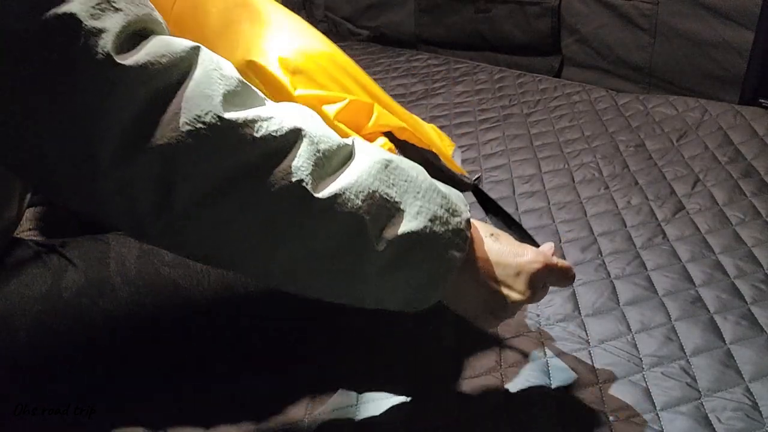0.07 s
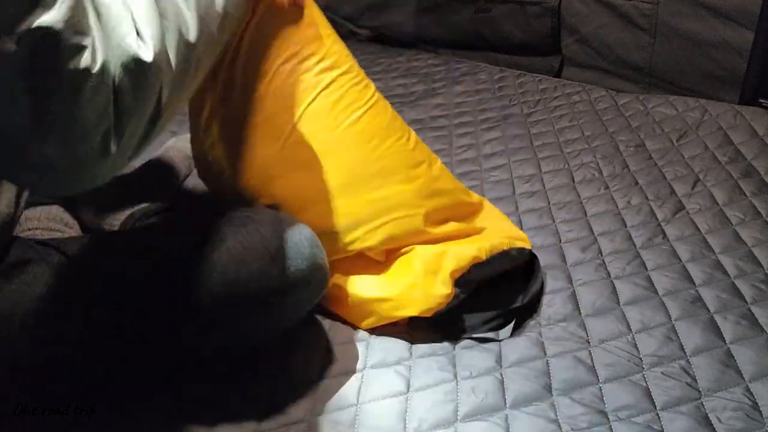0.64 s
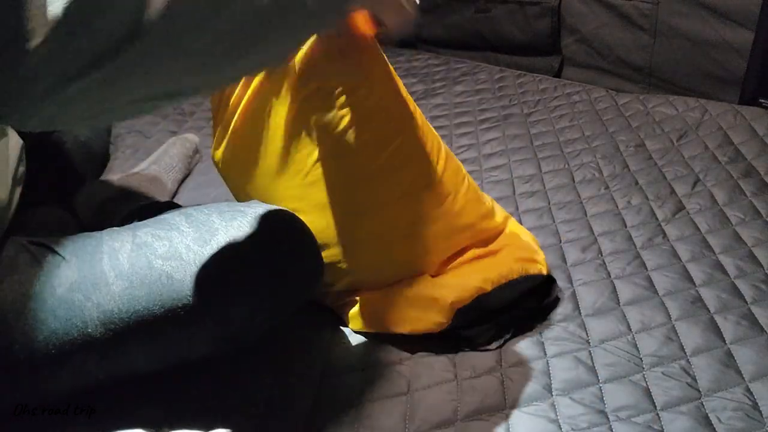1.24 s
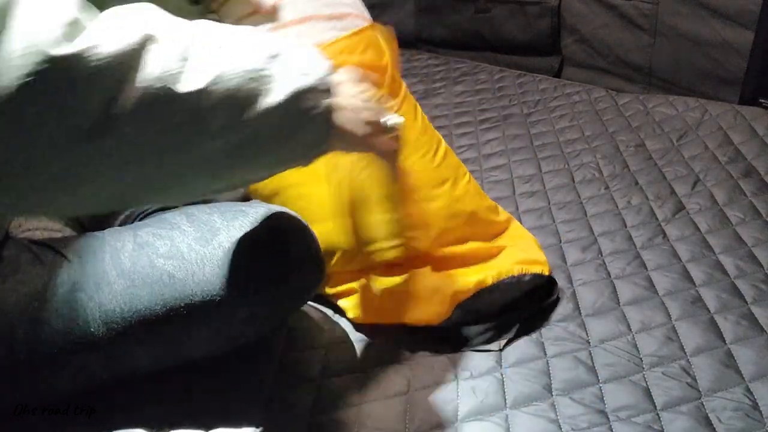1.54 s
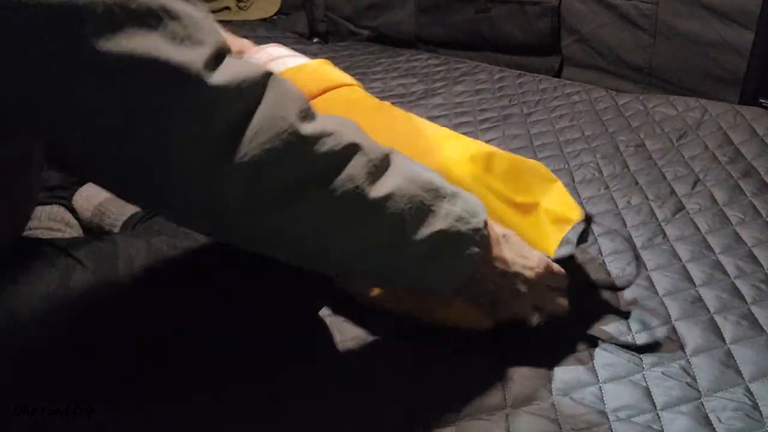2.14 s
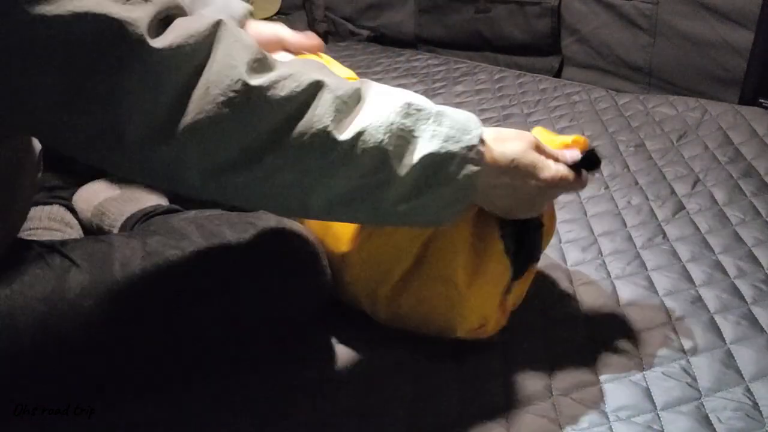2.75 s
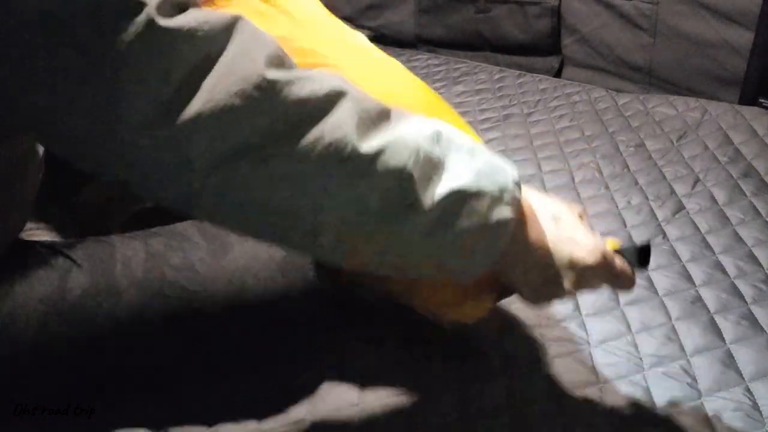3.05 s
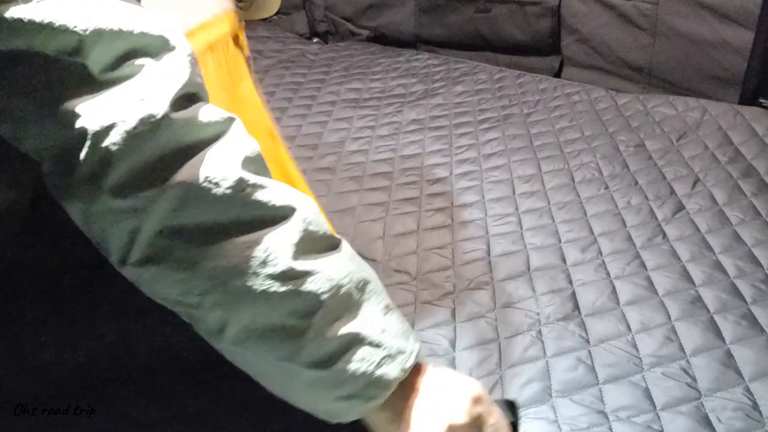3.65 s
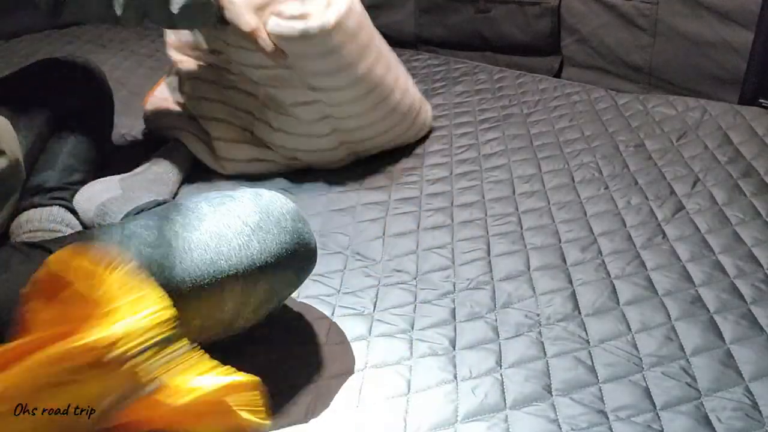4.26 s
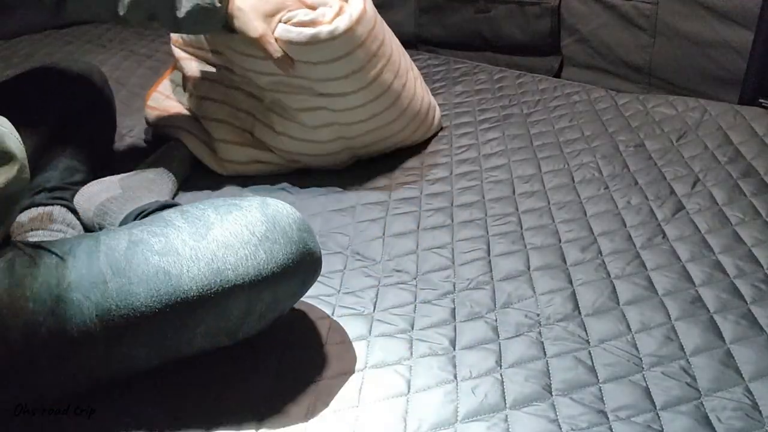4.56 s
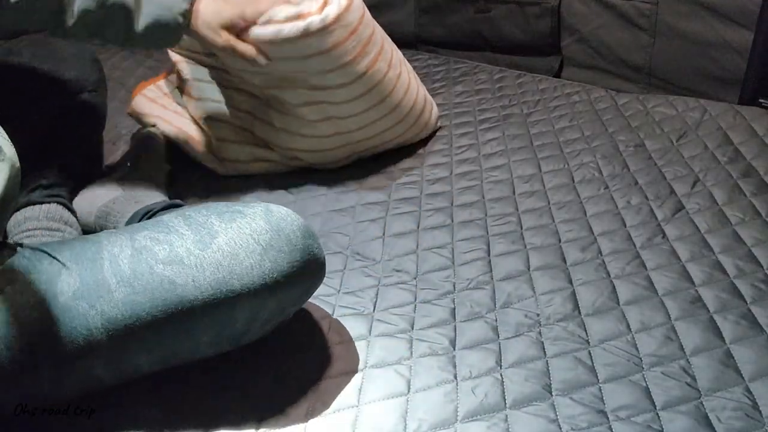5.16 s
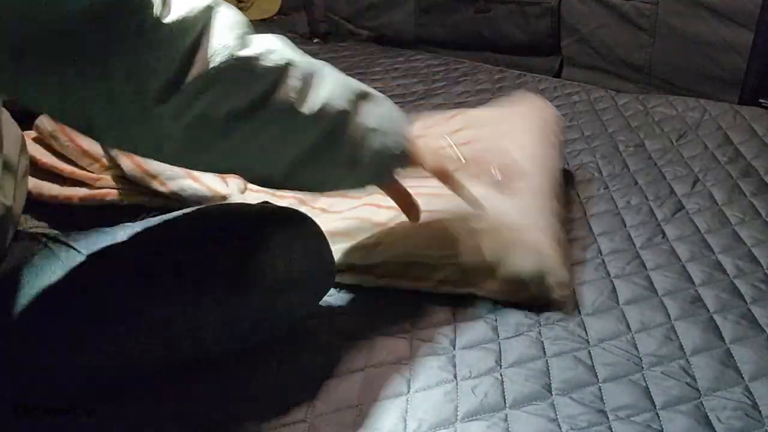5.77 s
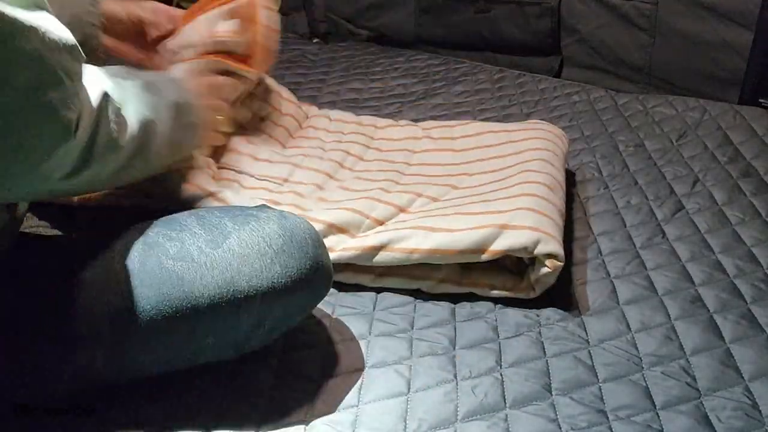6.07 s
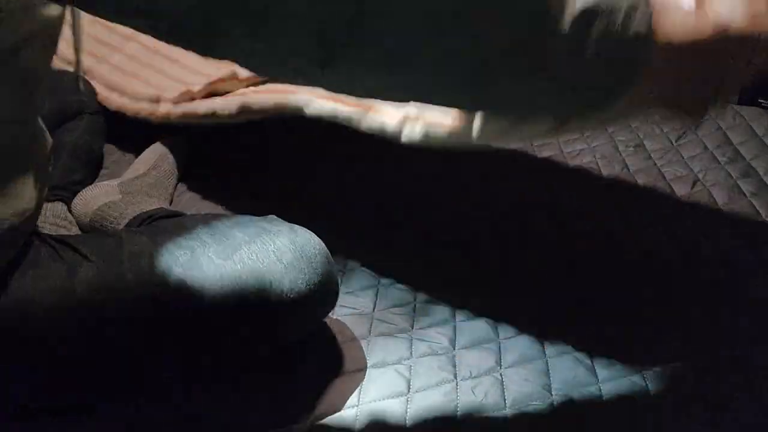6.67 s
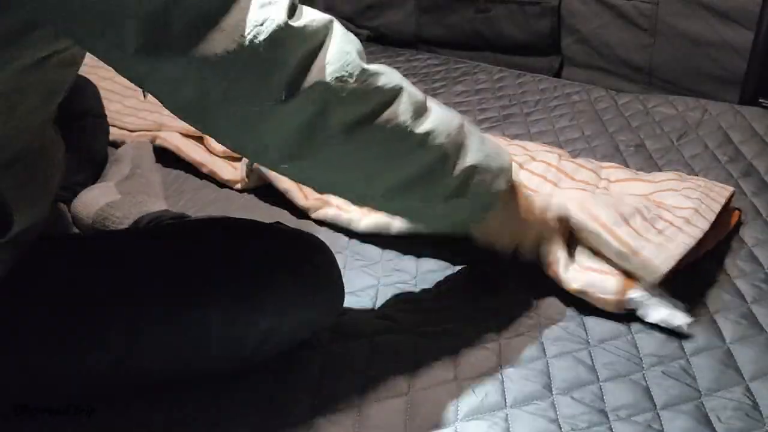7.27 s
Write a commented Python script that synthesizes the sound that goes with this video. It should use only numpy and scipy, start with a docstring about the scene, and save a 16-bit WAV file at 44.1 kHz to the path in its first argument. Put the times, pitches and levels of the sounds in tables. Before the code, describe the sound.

Hands tug at a nylon sack around a rolled blanket, making short hissing swishes and small crinkles. One long, bright pull strips the sack off. It squeaks faintly under the fingers and lands with a clack and a hollow knock. The blanket then rustles more softly as it unrolls, flaps open with a deep thump on the mattress and is smoothed flat. Everything is close, in a small tent with no echo.

```python
"""In a small, echo-free tent, hands tug at a nylon sack around a rolled blanket: nylon hisses as it
slides, soft cloth rubs and creases snap. At 3 s one long pull strips the sack off. It squeaks under the
fingers, is tossed aside and lands at 4.7 s with a clack of its toggle and a hollow knock. The blanket is
unrolled, flaps open near 7 s with a deep thump of the quilted mattress, and is smoothed flat."""
import sys
import numpy as np
from scipy import signal
from scipy.fft import rfft, irfft, next_fast_len
from scipy.io import wavfile

SR = 44100
rng = np.random.default_rng(int(sys.argv[2]) if len(sys.argv) > 2 else 0)


def generate_wav(sig):
    """Save sig (samples, or channels by samples) to the path in sys.argv[1] as 16-bit PCM at SR."""
    pcm = np.round(np.clip(np.atleast_2d(sig).T, -1, 1) * 32767).astype(np.int16)
    wavfile.write(sys.argv[1], SR, pcm)


N = 332073


# the tone of sliding nylon: f/Hz, level/dB
NYLON_TONE = [(50, -40), (140, -4.5), (300, -26), (500, -25), (800, -17.5), (1700, -8.5), (3000, -5.5),
              (4700, -3), (6000, -3), (7200, -3), (9700, -1), (12600, -4.5), (14000, -9), (15800, -17.5)]
def nylon(level_db, slips_per_s=24000, spread_db=2.0, flutter_db=0.84, dull_hz=7000, dull_share=0.25):
    """A fine weave slides: a faster pull gives more tiny slips and a smoother, brighter hiss."""
    speed = from_db((level_db - level_db.max()) / 2)
    hiss = coloured(friction(slips_per_s * speed, spread_db), NYLON_TONE)
    dull = dull_share * (1 - speed)
    hiss = (1 - dull) * hiss + dull * filtered(hiss, dull_hz, "low", order=1)
    return hiss * from_db(level_db + flutter_db * drift(90))


# the tone of rubbing cloth: f/Hz, level/dB
CLOTH_TONE = [(80, -7), (200, 2.5), (300, 1), (450, 2.5), (800, 1.5), (1300, 3), (2400, -1.5), (4500, -5),
              (5900, -6), (7300, -9.5), (11000, -11.5), (15500, -37)]
def cloth(level_db, slips_per_s=4000, spread_db=2.5, patchy_db=2.5, gain_db=3.5):
    """Blanket and sleeves rub with coarser, duller slips; each octave swells alone as the folds shift."""
    rest = coloured(friction(slips_per_s, spread_db), CLOTH_TONE)
    rub = 0
    for edge_hz in 300 * 2 ** np.arange(5):
        band = signal.sosfiltfilt(signal.butter(2, edge_hz, fs=SR, output="sos"), rest)
        rub = rub + band * from_db(patchy_db * drift(70))
        rest = rest - band
    return rms_one(rub + rest) * from_db(level_db + gain_db)


# hands stroking sack and blanket: middle t/s, length/s, nylon level/dB, cloth level/dB
HAND_STROKES = [(0.132, 0.56, -45, -62.5), (0.514, 0.17, -59, -79), (0.615, 0.12, -56, -58.5),
                (1.0, 0.13, -66, -68), (1.237, 0.24, -57, -70), (1.411, 0.16, -49.5, -58.5),
                (1.671, 0.19, -55, -60), (1.859, 0.14, -56, -63.5), (1.986, 0.14, -51, -61),
                (2.097, 0.12, -50.5, -55), (2.18, .2, -56.5, -60.5), (2.5, 0.067, -51.5, -57),
                (2.569, 0.086, -49.5, -55), (2.74, 0.18, -51, -56), (2.877, 0.1, -56, -64),
                (3.983, 0.17, -53.5, -62), (4.186, 0.21, -47, -58), (4.34, 0.13, -53, -55.5),
                (4.59, 0.13, -53.5, -66), (4.74, 0.33, -58.5, -63), (5.035, 0.21, -57, -63),
                (5.129, 0.14, -51.5, -55.5), (5.262, .115, -58, -62), (5.446, 0.073, -61, -60.5),
                (5.601, 0.29, -64, -60), (5.882, .1, -69, -59.5), (6.128, .28, -61.5, -60.5),
                (6.356, .045, -63.5, -60.5), (6.55, 0.17, -62.5, -60.5), (6.595, 0.049, -52, -60),
                (6.816, 0.11, -59, -61.5), (6.985, 0.13, -61, -60), (7.24, 0.36, -59.5, -66),
                (7.362, 0.032, -54, -58), (7.42, 0.078, -60, -74)]
# the long pull that strips the sack off: t/s, nylon level/dB, cloth level/dB
LONG_PULL = [(2.995, -73, -80), (3.011, -49.5, -60), (3.145, -42, -51.5), (3.25, -41.5, -56.5),
             (3.36, -44, -57.5), (3.6, -42, -54.5), (3.76, -42.5, -46), (3.835, -55, -56.5),
             (3.88, -75, -80)]
# sleeves and bedding rustling between strokes: t/s, nylon level/dB, cloth level/dB
LIGHT_RUSTLE = [(0.0, -73, -82), (0.42, -71, -83), (0.74, -64.5, -66.5), (0.88, -64, -75.5),
                (1.75, -67.5, -71), (2.1, -59.5, -63.5), (2.45, -56.5, -63), (2.98, -58, -64.5),
                (3.88, -55.5, -56.5), (4.45, -55.5, -59.5), (4.9, -57.5, -63.5), (5.35, -62, -64.5),
                (5.85, -67.5, -70), (6.35, -68, -66), (7.53, -68, -65.5)]
def handling(uneven_db=1.5, changes_per_s=30):
    """Moving hands set how loud the nylon and the cloth are: one curve in dB for each."""
    middle, length, *stroke_dbs = np.transpose(HAND_STROKES)
    t, levels = np.arange(N) / SR, []
    pulling = (t > LONG_PULL[0][0]) & (t < LONG_PULL[-1][0])
    wobble_db = uneven_db * drift(changes_per_s)
    for stroke_db, pull_db, rustle_db in zip(stroke_dbs, curves(LONG_PULL), curves(LIGHT_RUSTLE)):
        rest_db = rustle_db + wobble_db
        rest_db = np.where(pulling, np.maximum(pull_db, rest_db), rest_db)
        levels.append(swells(zip(middle, length, stroke_db), rest_db))
    return levels


# the sack landing and settling: t/s, thud level/dB, clack level/dB
LANDINGS = [(4.672, -57, -35), (4.676, -34, -30.5), (4.6793, -23, -35.5), (4.6839, -26.5, -34),
            (4.699, -32.5, -64), (4.717, -39, -58.5), (4.747, -51, -38.5), (4.753, -47, -42.5),
            (5.14, -48, -37.5)]
# the notes of the hollow thing it lands on: f/Hz, level/dB, time to fade by 60 dB/s
HOLLOW_NOTES = [(215.4, -12, 0.14), (420, -1.5, 0.044), (465, -11, .08), (573, -1.5, 0.078),
                (693, -1.5, 0.032), (740, -3, 0.053), (926, -15, 0.042)]
# the notes of the hard toggle on its cord: f/Hz, level/dB, time to fade by 60 dB/s
TOGGLE_NOTES = [(975, -1.5, 0.035), (1895, -3.5, 0.025), (2040, -11, 0.023), (2330, -8, 0.024),
                (2830, -8, 0.042), (3900, -11, 0.028), (5140, -12.5, .025)]
def sack_landing():
    """The toggle clacks first, then the weight of the sack follows and bounces."""
    out = np.zeros(N)
    for s, thud_db, clack_db in LANDINGS:
        add(out, s, from_db(thud_db) * struck(HOLLOW_NOTES) + from_db(clack_db) * struck(TOGGLE_NOTES))
    return out


# soft blows on padding and blanket: t/s, level/dB, f/Hz, time to fade by 60 dB/s, ringing share (0-1)
SOFT_BLOWS = [(0.58, -50.5, 200, .1, .1), (1.579, -41.5, 255, 0.16, 0.9), (1.672, -27, 125, 0.048, .7),
              (1.799, -42, 640, 0.017, 0.5), (1.861, -43, 274, 0.054, .6), (1.965, -39, 524, .018, 0.4),
              (2.123, -40.5, 100, .1, 0.5), (2.576, -43.5, 230, 0.076, .1), (2.775, -48, 200, 0.094, 0.16),
              (3.207, -32.5, 480, 0.022, 0.3), (3.77, -38.5, 224, .07, .2), (4.68, -27.5, 210, 0.067, 0.5),
              (4.718, -34, 226, 0.15, 0.4), (4.754, -36.5, 340, .087, .8), (4.941, -31.5, 186, 0.054, 0.84),
              (5.145, -39, 139, 0.088, 0.24), (5.893, -44, 256, 0.081, 0.2), (6.965, -24, 135, 0.059, 0.73),
              (7.008, -28, 150, 0.067, .5), (7.018, -22.5, 262, .019, .7), (7.359, -26, 540, 0.016, 0.4),
              (7.365, -34, 310, 0.037, .35)]
def thumps(more_blows, puff_db=-2.5, rise_s=0.00059):
    """Each blow rings briefly and squeezes out a dull puff of air."""
    out, t = np.zeros(N), np.arange(SR // 3) / SR
    for s, db, hz, fade_s, ringing in SOFT_BLOWS + more_blows:
        puff = rms_one(filtered(rng.standard_normal(len(t)), [hz / 2, hz * 1.74], "band"))
        puff *= np.sqrt(1 - ringing) * from_db(puff_db)
        ring = -np.sqrt(ringing) * np.sin(2 * np.pi * hz * t)
        fade = (1 - np.exp(-t / rise_s)) * from_db(-60 * t / fade_s)
        add(out, s, from_db(db) * fade * (puff + ring))
    return out


def blanket_flap(start_s=6.941, length_s=.066, folds=6, fold_hz=215, fade_s=0.062, ringing=.35):
    """The folds slap down one after another, hardest in the middle of the run; rows for thumps()."""
    chance, rows = np.clip(rng.standard_normal((folds, 2)), -2, 2), []
    for along, (late, pitch) in zip(np.linspace(0, 1, folds), chance):
        s = start_s + length_s * along + .002 * late
        db = -30.5 - 7 * (1 - np.sin(np.pi * along))
        rows.append((s, db, fold_hz * np.exp(.4 * pitch), fade_s, ringing))
    return rows


# heavy loads on the mattress: t/s, level/dB
HEAVY_LOADS = [(2.124, -39), (4.694, -36), (4.952, -33), (5.905, -47), (6.974, -26), (7.029, -32)]
def mattress_bounces(hz=61.3, fade_s=0.22, ringing=0.68):
    """The mattress bounces, always at its own deep pitch; rows for thumps()."""
    return [(s, db, hz, fade_s, ringing) for s, db in HEAVY_LOADS]


# creases snapping over: t/s, level/dB, middle f/Hz, length/s
CREASE_SNAPS = [(0.608, -40, 1400, .007), (0.615, -36.5, 4200, 0.0065), (0.649, -43, 1300, .0035),
                (0.682, -40.5, 4000, .0025), (1.183, -43.5, 1400, .006), (1.618, -37.5, 1590, 0.0021),
                (1.667, -35, 1600, .014), (1.673, -29.5, 7500, 0.012), (1.964, -33, 2700, .005),
                (2.078, -33, 3200, .0016), (2.121, -23, 1200, 0.0013), (2.283, -39, 1000, .0027),
                (2.4, -43, 1800, 0.002), (2.61, -28, 3820, 0.0015), (2.751, -36, 4100, .004),
                (4.011, -35, 890, 0.0064), (4.104, -36, 7400, .006), (4.673, -24.5, 2500, 0.0082),
                (4.885, -40, 5540, .0043), (5.138, -23.5, 1260, 0.0019), (7.292, -34, 1700, 0.0024),
                (7.343, -39, 860, 0.013), (7.358, -31, 2300, 0.0052)]
def creases(more_snaps, gain_db=-6.0, rise_share=0.19):
    """A fold buckles with a short crackle around its own pitch; a longer one builds more slowly."""
    out, t = np.zeros(N), np.arange(SR // 10) / SR
    for s, db, hz, length in CREASE_SNAPS + more_snaps:
        crackle = filtered(rng.standard_normal(len(t)), hz * 0.51, "high")
        crackle = filtered(crackle, hz * 1.54, "low")
        fade = (1 - np.exp(-t / (rise_share * length))) * np.exp(-t / length)
        snap = rms_one(crackle * fade) * np.sqrt(np.mean(fade ** 2))
        add(out, s, from_db(db + gain_db) * snap)
    return out


def small_creases(cloth_db, per_s=5.0, boost_db=14.5, hz=2400, length_s=0.0044):
    """Small folds tick at random, louder when the cloth rubs harder; rows for creases()."""
    moments = np.flatnonzero(rng.random(N) < per_s / SR)
    chance = np.clip(rng.standard_normal((len(moments), 2)), -2, 2)
    return [(at / SR, cloth_db[at] + boost_db + 2.0 * size, hz * np.exp(0.72 * pitch), length_s)
            for at, (size, pitch) in zip(moments, chance)]


# tight nylon zipping over a finger: t/s, length/s, start f/Hz, end f/Hz, level/dB
FINGER_ZIPS = [(2.099, 0.022, 650, 1090, -45), (2.113, 0.0077, 1900, 5960, -32.5),
               (4.023, 0.017, 3250, 3900, -48), (4.342, .025, 5200, 3450, -46),
               (4.593, 0.021, 2700, 4040, -44), (4.876, 0.0204, 5230, 5870, -50),
               (7.255, 0.0065, 1840, 2200, -47)]
def finger_squeaks(from_s=3.97, to_s=4.87, per_s=70, level_db=-53, pitch_hz=3600, length_s=0.0116):
    """Fingers drag on the sack: a few clear zips, and a spell of tiny random squeaks."""
    out, t = np.zeros(N), np.arange(N) / SR
    for s, length, start_hz, end_hz, db in FINGER_ZIPS:
        add(out, s, from_db(db) * squeak(length, start_hz, end_hz))
    dragging = (t > from_s) & (t < to_s)
    for s in t[dragging & (rng.random(N) < per_s / SR)]:
        pitch, bend, size = np.clip(rng.standard_normal(3), -2, 2)
        hz = pitch_hz * np.exp(.25 * pitch)
        add(out, s, from_db(level_db + 0.5 * size) * squeak(length_s, hz, hz * np.exp(.25 * bend)))
    return out


def squeak(length, start_hz, end_hz, rough=0.46):
    """Ribs of the weave tick past so fast that they make a sliding note, swelling until they let go."""
    along = np.linspace(0, 1, max(int(length * SR), 8))
    hz = start_hz + (end_hz - start_hz) * along ** 2
    hz *= 1 + rough * rng.standard_normal(SR // 10)[:len(along)]
    return np.sin(np.pi * along ** 2) * np.sin(2 * np.pi * np.cumsum(hz) / SR)


# the tone of squashed padding: f/Hz, level/dB
PADDING_TONE = [(20, -13), (40, -4.5), (62, 7), (100, 3.5), (150, -2.5), (220, -20), (320, -16), (600, -33),
                (1500, -55)]
# knees and hands leaning in: middle t/s, length/s, level/dB
LEANING = [(2.0, 0.16, -61), (2.67, .36, -63), (3.85, 0.64, -56), (5.03, 0.73, -51), (6.05, 0.47, -65),
           (6.66, 0.27, -61.5), (7.12, .26, -57.5)]
# the steady weight of the kneeling body: start level/dB, end level/dB
BODY_WEIGHT = [-70, -66]
def mattress_rumble(lump_db=0.9, gain_db=1.0):
    """Knees and hands knead the padding into a lumpy rumble."""
    weight_db = swells(LEANING, np.linspace(*BODY_WEIGHT, N))
    rumble = coloured(rng.standard_normal(N), PADDING_TONE)
    return rumble * from_db(weight_db + gain_db + lump_db * drift(25))


# the tone of the still air: f/Hz, level/dB
AIR_TONE = [(20, -28), (60, -16), (130, 3), (250, -15), (500, -28), (1300, -12.5), (3000, -18.5),
            (10000, -19), (15500, -38)]
def still_air(level_db=-66.5):
    """A faint, steady hush lies behind everything."""
    return from_db(level_db) * coloured(rng.standard_normal(N), AIR_TONE)


# pitches that the tent and the microphone opening lift or swallow: f/Hz, width/Hz, level change/dB
TENT_BANDS = [(287, 48, 5), (366, 69, -4), (990, 47, -3.5), (1390, 730, -0.5), (4240, 2900, 0.5),
              (5780, 1100, -4), (7250, 680, 2), (7670, 220, 1)]
def tent(x):
    """The small padded space changes the tone but adds no echo."""
    for hz, width_hz, db in TENT_BANDS:
        band = signal.lfilter(*signal.iirpeak(hz, hz / width_hz, fs=SR), x)
        x = x + (from_db(db) - 1) * band
    return x


def friction(per_s, spread_db):
    """Threads catch and let go: tiny slips of uneven size at random moments."""
    slips = (rng.random(N) < per_s / SR) * rng.choice([-1, 1], N)
    size_db = spread_db * np.minimum(rng.exponential(1, N), 4)
    return rms_one(slips * from_db(size_db))


def struck(notes):
    """One blow makes all the notes of an object ring; every second one starts the opposite way."""
    t = np.arange(SR // 4) / SR
    hz, db, fade_s = np.transpose(notes)[:, :, None]
    rings = np.sin(2 * np.pi * hz * t) * from_db(db - 60 * t / fade_s)
    return (-1) ** np.arange(len(notes)) @ rings


def swells(rows, rest_db, steepness=0.86):
    """Each movement speeds up and slows down: an arch in dB above a resting level."""
    t, power = np.arange(N) / SR, from_db(rest_db) ** 2
    for s, length, db in rows:
        moving = np.abs(t - s) < length / 2
        arch = np.abs(np.cos(np.pi * (t[moving] - s) / length)) ** steepness
        power[moving] += (from_db(db) * arch) ** 2
    return 10 * np.log10(power)


def coloured(x, tone):
    """Shape a noise with a tone table, at an average power of 1."""
    hz, db = np.transpose(tone)
    size = next_fast_len(N)
    bin_hz = np.maximum(np.fft.rfftfreq(size, 1 / SR), 1)
    gain = from_db(np.interp(np.log(bin_hz), np.log(hz), db))
    return rms_one(irfft(rfft(x, size) * gain, size)[:N])


def filtered(x, hz, kind, order=2):
    """Keep the lows, the highs or a band in between."""
    sections = signal.butter(order, np.clip(hz, 10, .45 * SR), kind, fs=SR, output="sos")
    return signal.sosfilt(sections, x + 1e-18)


def drift(per_s):
    """A random wobble, about 1 in size, that changes course per_s times a second."""
    steps = np.arange(N) / SR * per_s
    return rms_one(np.interp(steps, np.arange(8192), rng.standard_normal(8192)))


def curves(rows):
    """Join a table's points in time with straight lines, one curve per level column."""
    s, *columns = np.transpose(rows)
    return [np.interp(np.arange(N) / SR, s, column) for column in columns]


def add(track, s, sound):
    """Mix a sound in, starting at s seconds."""
    start = max(round(s * SR), 0)
    track[start:start + len(sound)] += sound[:max(N - start, 0)]


def from_db(db):
    """Turn decibels into a number to multiply by."""
    return 10 ** (np.asarray(db) / 20)


def rms_one(x):
    """Scale to an average power of 1."""
    return x / np.sqrt(np.mean(x ** 2) + 1e-20)


def scene():
    """Everything is close and in the middle, alike in both ears."""
    nylon_db, cloth_db = handling()
    air = still_air()
    blows = mattress_rumble() + thumps(mattress_bounces() + blanket_flap()) + sack_landing()
    fabric = nylon(nylon_db) + cloth(cloth_db) + creases(small_creases(cloth_db)) + finger_squeaks()
    mix = blows + tent(fabric + air)
    return np.array([mix, mix])


def record(dry, bass_hz=30, treble_hz=15750):
    """The microphone drops the deepest bass, and the highest treble is cut off."""
    treble_cut = signal.ellip(12, .1, 90, treble_hz, fs=SR, output="sos")
    return signal.sosfilt(treble_cut, filtered(dry, bass_hz, "high"))


dry = scene()
out = record(dry)
generate_wav(out)
```